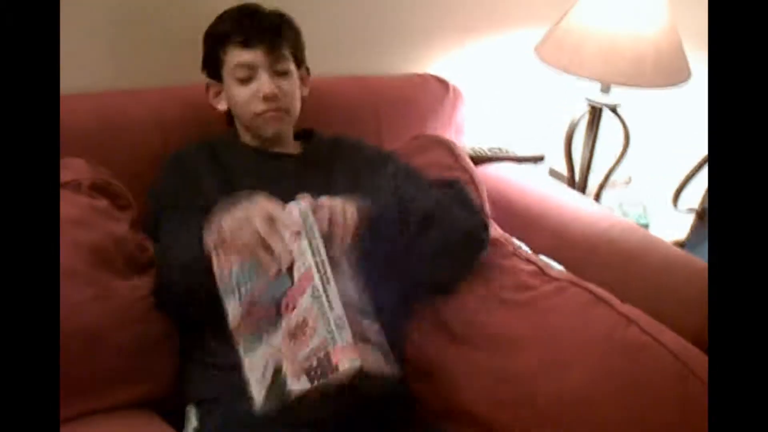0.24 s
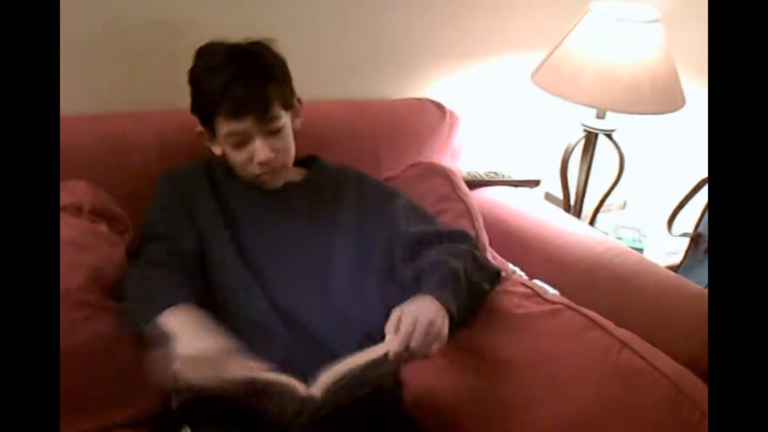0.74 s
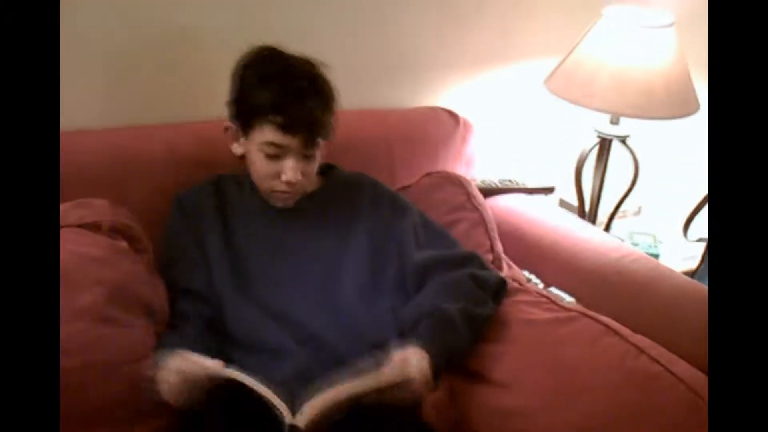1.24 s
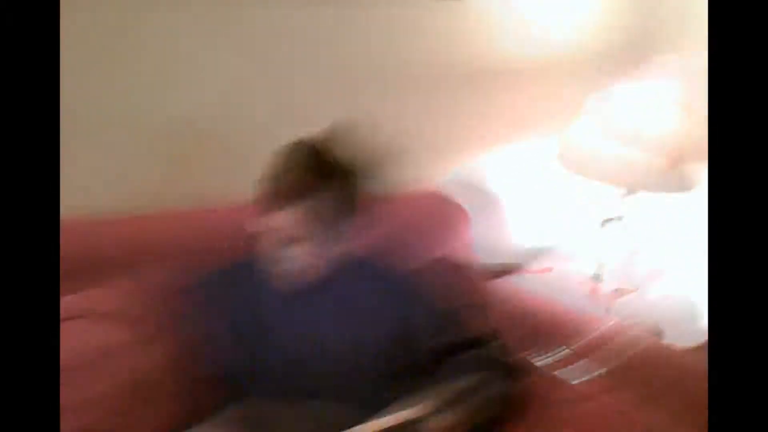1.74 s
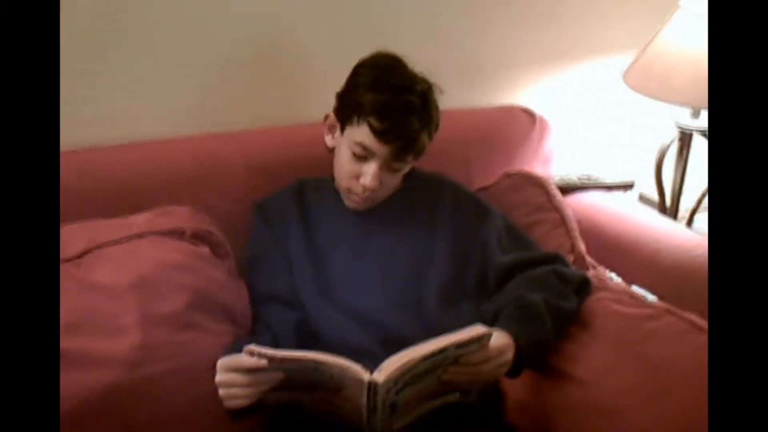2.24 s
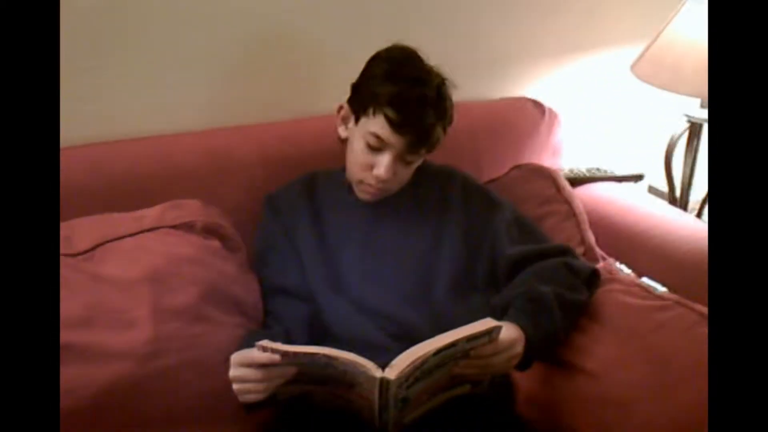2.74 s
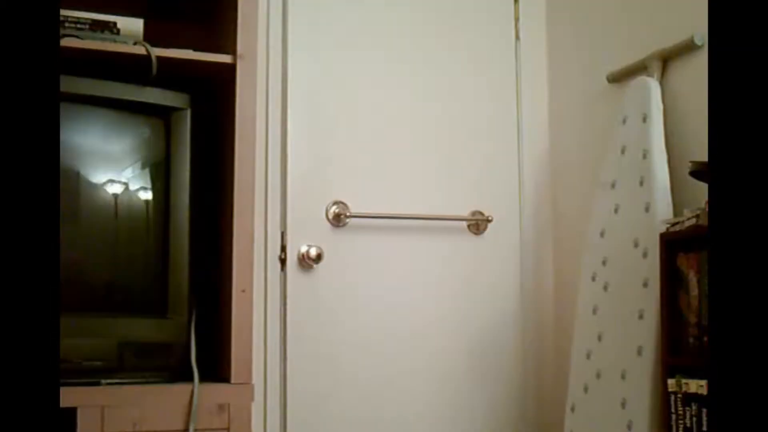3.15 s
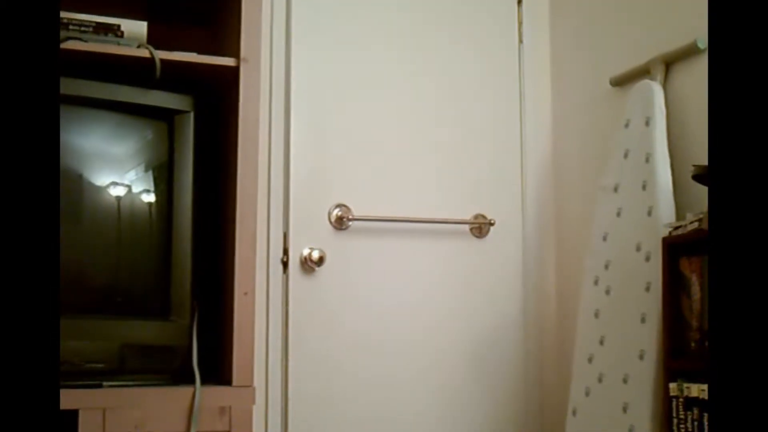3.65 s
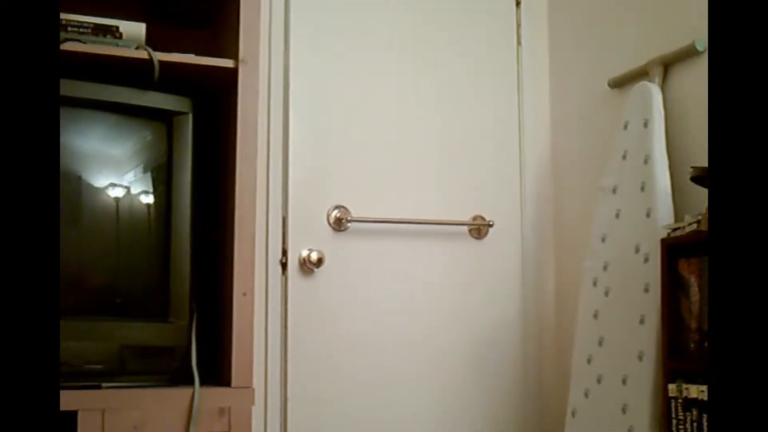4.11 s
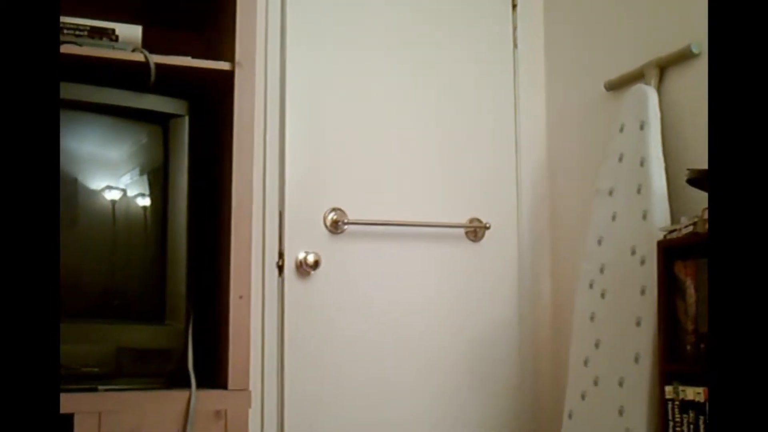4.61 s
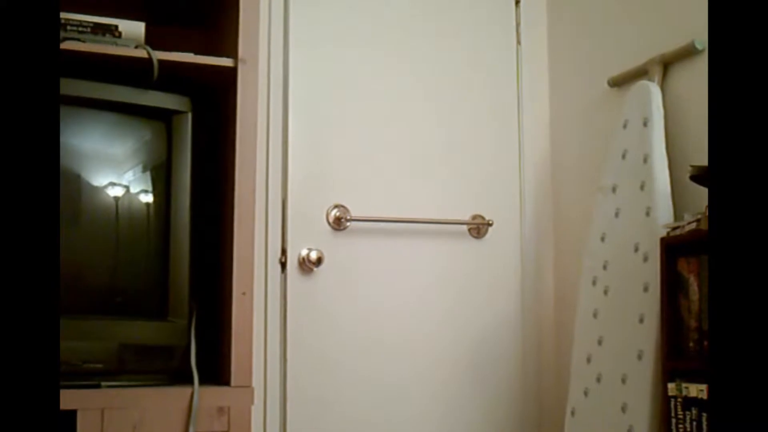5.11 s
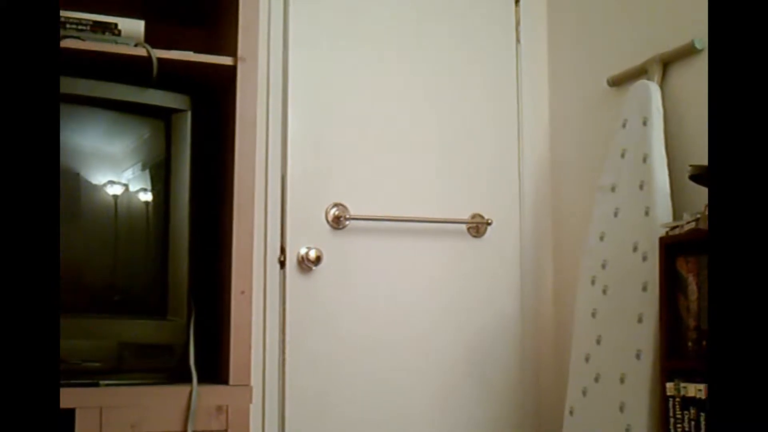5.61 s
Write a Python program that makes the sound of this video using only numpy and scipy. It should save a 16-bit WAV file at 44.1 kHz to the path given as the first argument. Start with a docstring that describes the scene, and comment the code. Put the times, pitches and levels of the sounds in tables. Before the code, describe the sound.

In a quiet room, paperback pages rustle softly, with light flaps and a few dry ticks from the spine. A dull pop and an instant of silence follow. Then someone knocks seven times on a closed wooden door, quickly and ever louder, the last rap making the latch chirp. Two pairs of heavy blows rattle the metal fittings and overload the dull-sounding microphone.

```python
"""Pages rustle softly as a boy on a sofa opens a paperback and settles it; the spine ticks. After a dull
pop and an instant of silence, someone knocks on a closed wooden door in a small room: seven growing raps,
two pairs of heavy blows. The paper sounds by sliding friction. Each impact excites the damped modes of
door and room. The last rap makes the latch chirp; it and the heavy blows rattle the metal fittings.
The heavy blows overload the microphone."""
import sys
import numpy as np
from scipy import signal
from scipy.fft import rfft, irfft, next_fast_len
from scipy.io import wavfile
from scipy.ndimage import uniform_filter1d, map_coordinates

SR = 44100
rng = np.random.default_rng(int(sys.argv[2]) if len(sys.argv) > 2 else 0)


def put_to_file(sound):
    """Save the sound as 16-bit audio at rate SR, in the file named by the first command-line argument."""
    columns = np.atleast_2d(sound).T  # one column per channel
    safe = np.clip(columns, -1, 1)
    whole_steps = np.round(safe * 32767)
    wavfile.write(sys.argv[1], SR, whole_steps.astype(np.int16))


N = 258867

# room tone and hiss: (frequency [Hz], relative level [dB])
AIR_SPECTRUM = [(12, -11.5), (20, -0.5), (120, -6), (146, -4.5), (319, -7.5), (369, -15.5), (449, -10.5),
                (521, -16), (618, -16), (770, -19.5), (829, -17.5), (1230, -21), (1570, -24.5),
                (4180, -29.5), (6990, -48.5), (9090, -72), (15400, -120)]
# broad sheets sliding: (frequency [Hz], relative level [dB])
SHEET_SPECTRUM = [(150, -8), (400, -2.5), (900, 0), (1400, 1), (2200, -12), (3200, -26), (5000, -41)]
# page edges sliding: (frequency [Hz], relative level [dB])
EDGE_SPECTRUM = [(1500, -24), (2800, -3.5), (4300, 6), (5400, -13.5), (7000, -15), (8000, -48)]
# page strokes: (start [s], rise [s], hold [s], release t60 [s], swish [dB], hiss re swish [dB])
PAGE_STROKES = [(.212, 0.013, 0.014, .35, -39.5, -8), (0.309, .08, 0.084, 0.53, -41.5, -11.5),
                (0.577, 0.062, .02, .35, -40.5, -13), (.917, .01, .06, .4, -44.5, -15),
                (1.024, 0.052, 0.055, 0.54, -40, -10.5), (1.322, 0.029, 0.07, .6, -39.5, -14),
                (1.638, 0.095, 0.052, 0.21, -40.5, -7.5)]
# the book shifting in the hands: (rise [s], hold [s], release t60 [s], swish [dB], hiss re swish [dB])
BOOK_SHIFT = (0.11, 1.74, 0.64, -48.5, -13)
# soft flaps and bumps: (time [s], level [dB], low edge [Hz], high edge [Hz], t60 [s])
BOOK_FLAPS = [(.455, -36, 89, 170, 0.2), (0.499, -20.5, 450, 1370, 0.067), (0.508, -21.5, 272, 1290, 0.28),
              (.592, -34, 280, 590, .2), (.712, -33, 231.5, 533, 0.2), (0.923, -38.5, 648, 1710, 0.12),
              (3.187, -42.5, 555.6, 1650, 0.2)]
# the book's dry ticks, plus a separate dull pop just before the brief silence:
# (time [s], level [dB], frequency [Hz], t60 [s], snap re ring [dB])
TICKS_AND_POP = [(.109, -39, 4000, .02, 0), (1.036, -29, 1200, .03, -14), (1.968, -34, 600, .025, -20),
                 (2.1297, -32, 1400, .012, 0), (2.1318, -24, 650, .025, -16), (2.172, -30, 600, .02, -17),
                 (2.1855, -22, 1300, .012, -4), (2.2335, -32, 1430, .018, -11),
                 (4.884, -32, 1500, .012, -4), (3.131, -19, 180, .02, -40)]
# the latch rubbing its plate: (time [s], level [dB], frequency [Hz])
LATCH_SLIPS = [(4.794, -17.5, 2470), (4.8046, -12, 2070), (4.813, -15.5, 1790)]
# loose fittings falling back: (time [s], level [dB], clashes [count])
FITTING_RATTLES = [(5.1515, -26.5, 1), (5.294, -32.5, 1), (5.591, -22.5, 3), (5.775, -27, 1)]
# resonances of the fittings: (frequency [Hz], bandwidth [Hz], relative level [dB])
METAL_MODES = [(3937, 250, 0.5), (5340, 930, -14), (7060, 92, -22)]
# metal striking metal: (frequency [Hz], relative level [dB])
CLASH_SPECTRUM = [(800, -13), (1300, 9.5), (2000, 1.5), (3000, -7.5), (4600, -4), (5600, -7.5), (6500, -16),
                  (7200, -23), (7900, -22.5)]
# the room's diffuse field: (frequency [Hz], relative level [dB])
REVERB_SPECTRUM = [(60, -23), (150, -11.5), (400, 5.5), (750, 0.5), (1300, -4), (2000, -14), (3000, -14),
                   (4500, -7.5), (7000, -19.5), (8000, -25.5)]
# the room's reverberation time: (frequency [Hz], t60 [s])
REVERB_TIMES = [(100, 0.54), (300, 0.33), (1000, 0.35), (5000, 0.28)]
# modes of the door and its room: (frequency [Hz], relative level [dB], t60 [s])
DOOR_MODES = [(46.87, -19.5, 0.94), (57.57, -15.5, 0.55), (83.2, -25, 0.4), (116.8, -21, 0.17),
              (132.5, -25, 0.31), (156.7, -22, 0.16), (213.7, -33, 0.18), (235.5, -21, 0.12),
              (265, -26, 0.2), (291.9, -31, .35), (347.5, -21, 0.22), (414, -24, 0.24), (462, -25, 0.32),
              (479.6, -25.5, 0.29), (510, -25.5, 0.3), (570.3, -22, 0.23), (643, -29, 0.19),
              (748, -19.5, 0.11), (808, -28.5, 0.29), (882, -27.5, 0.16), (930, -39.5, 0.4),
              (1015, -38.5, 0.36), (1055, -43, 0.3), (1124, -32, 0.23), (1148, -26.5, 0.15),
              (1261, -25, 0.089), (1316, -38.5, 0.28), (1376, -35, 0.27), (1472, -25.5, 0.08),
              (1595, -29.5, 0.092)]
# the whole leaf rocking in its frame: (frequency [Hz], relative level [dB], t60 [s])
LEAF_SWAY = (27, -20, 0.81)
# the struck panel's brief slap: (frequency [Hz], relative level [dB], time to peak [s])
PANEL_SLAP = [(67, -31.5, 0.0037), (318.4, -24.5, 0.013), (557, -15, 0.0057), (908, -22.5, 0.0036),
              (1134, -28.5, 0.0045), (1310, -34.5, 0.0059)]
# colour given by the hand's mass, at a weight of 1: (frequency [Hz], gain [dB])
HAND_COLOUR = [(25, 3), (55, 0.5), (125, 8.5), (250, 5), (360, -4.5), (550, -3.5), (850, 0.5), (1200, 3.5),
               (1700, 2.5), (2500, -0.5)]
# blows on the door: (time [s], force level [dB])
BLOWS = [(3.81, -0.3), (3.9653, 0), (4.122, -0.4), (4.2907, 1.34), (4.4574, 1.5), (4.6235, 3),
         (4.7845, 5.5), (5.103, 8.5), (5.2541, 10.5), (5.5704, 12), (5.758, 7)]


def amp(db):
    """Decibels to amplitude ratio."""
    return 10 ** (np.asarray(db) / 20)


def unit(x):
    """Normalisation to rms 1."""
    return x / np.sqrt(np.mean(x ** 2) + 1e-20)


def along(points, hz):
    """Interpolation of (frequency, value) points on a log frequency axis."""
    f, v = np.transpose(points)
    return np.interp(np.log(hz + 1), np.log(f + 1), v)


def add(track, s, sound):
    """Superposition: the sound joins the track from s seconds on."""
    part = track[round(s * SR):][:len(sound)]
    part += sound[:len(part)]


def filtered(x, gain):
    """Zero-phase filtering by a gain that depends on frequency."""
    m = next_fast_len(len(x) + 8192)
    return irfft(rfft(x, m) * gain(np.fft.rfftfreq(m, 1 / SR)), m)[:len(x)]


def causal(x, gain, size=4096):
    """Minimum-phase filtering: nothing sounds before the blow."""
    cepstrum = irfft(np.log(np.maximum(gain(np.fft.rfftfreq(size, 1 / SR)), 1e-6)))
    cepstrum[1:size // 2] *= 2
    cepstrum[size // 2 + 1:] = 0
    impulse_response = irfft(np.exp(rfft(cepstrum)))
    return signal.fftconvolve(x, impulse_response)[:len(x)]


def shaped_noise(gain, size=SR):
    """Spectral shaping: white noise through a gain curve, at rms 1."""
    return unit(filtered(rng.standard_normal(size), gain))


def noise(spectrum, size=SR):
    """Coloured noise of rms 1 with a tabulated spectrum."""
    return shaped_noise(lambda hz: amp(along(spectrum, hz)), size)


def second():
    """A time axis of one second."""
    return np.arange(SR) / SR


def fade(t60, rise=1e-5):
    """Exponential damping: an envelope that builds up, then loses 60 dB in t60 seconds."""
    return np.exp(-np.log(1000) * second() / t60) * (1 - np.exp(-second() / rise))


def room_tone():
    """Stationary noise: the quiet of the house."""
    return amp(-44) * noise(AIR_SPECTRUM, N)


def slide_speed(start, rise, hold, t60):
    """Damped motion: a sliding page picks up speed, holds it, then slows exponentially."""
    t = np.arange(N) / SR - start
    return np.clip(t / rise, 0, 1) * np.exp(-np.log(1000) * np.maximum(t - rise - hold, 0) / t60)


def pages(catch_rate_hz=90, catch_depth_db=1.5):
    """Sliding friction: paper catches and lets go, its noise grows with speed, strokes add in power."""
    strokes = [*PAGE_STROKES, (0, *BOOK_SHIFT)]
    moves = [(slide_speed(*timing), db, edge_db) for *timing, db, edge_db in strokes]
    swish = np.sqrt(sum((speed * amp(db)) ** 2 for speed, db, _ in moves))
    hiss = np.sqrt(sum((speed * amp(db + edge_db)) ** 2 for speed, db, edge_db in moves))
    catch_index = np.arange(N) * catch_rate_hz / SR
    catches = map_coordinates(rng.standard_normal(N // 100), [catch_index], mode="mirror")
    grip = unit(amp(catch_depth_db * catches))
    return grip * (swish * noise(SHEET_SPECTRUM, N) + hiss * noise(EDGE_SPECTRUM, N))


def flaps():
    """Soft impacts give dull, band-limited puffs of noise, as when the book falls open on a lap."""
    out = np.zeros(N)
    for s, db, low_hz, high_hz, t60 in BOOK_FLAPS:
        band = lambda hz: hz ** 2 / np.hypot(hz ** 2, low_hz ** 2) / np.sqrt(1 + (hz / high_hz) ** 13)
        add(out, s, amp(db) * shaped_noise(band) * fade(t60, rise=0.0013))
    return out


def ticks_and_pop():
    """Impulse excitation: each is a few cycles of damped ring under a tiny snap."""
    out = np.zeros(N)
    snap_spectrum = [(500, 29.5), (4500, 23.0), (7000, -12.0), (8500, -46.0)]
    for s, db, hz, t60, snap_db in TICKS_AND_POP:
        snap = amp(snap_db) * noise(snap_spectrum) * fade(0.011)
        ring = np.sin(2 * np.pi * hz * second()) * fade(t60)
        add(out, s, amp(db) * (ring + snap))
    return out


def latch():
    """Stick-slip friction: each slip is a brief chirp with a faint echo around its pitch."""
    out = np.zeros(N)
    for s, db, hz in LATCH_SLIPS:
        chirp = np.sin(2 * np.pi * hz * second()) * fade(0.015, rise=0.00067)
        echo = shaped_noise(lambda f: 1 / (1 + ((f - hz) / 220) ** 2)) * fade(0.31, rise=0.0057)
        add(out, s, amp(db) * (chirp + amp(-24) * echo))
    return out


def fittings(jolt_above_db=4.2, jolt_lag_s=0.011, jolt_gain_db=-45, chatter_gap_s=0.0138):
    """Contact rattle: loose metal resonates when jolted, and chatters as the door springs back."""
    out = np.zeros(N)
    resonances = lambda f: sum(amp(db) / (1 + (2 * (f - hz) / width) ** 2)
                               for hz, width, db in METAL_MODES)
    jolts = [(s + jolt_lag_s, db + jolt_gain_db) for s, db in BLOWS if db > jolt_above_db]
    chatter = [(s + k * chatter_gap_s, db)
               for s, db, count in FITTING_RATTLES for k in range(round(count))]
    for s, db in jolts + chatter:
        ring = amp(-3.5) * shaped_noise(resonances)
        clash = amp(-6.5) * noise(CLASH_SPECTRUM)
        add(out, s, amp(db) * (ring + clash) * fade(0.24, rise=0.00063))  # smeared by the room
    return out


def reverberation():
    """Diffuse field: the room's reflections merge into decaying noise, and the treble dies first."""
    hz, t, spectra = signal.stft(noise(REVERB_SPECTRUM), SR, nperseg=256)
    decay = np.exp(-np.log(1000) * t / along(REVERB_TIMES, hz)[:, None])
    tail = signal.istft(spectra * decay, SR, nperseg=256)[1][:SR]
    return tail * (1 - np.exp(-second() / 0.0014))


def door_mode(hz, t60):
    """Damped oscillation: low modes follow the push quickly, higher ones build up between the walls."""
    phase = 2 * np.pi * hz * second()
    if hz < 100:
        return np.sin(phase) * fade(t60, rise=0.0047)
    return np.cos(phase) * fade(t60, rise=0.0084)


def hand_contact(response, force_db, weight, soft_hz=830, hard_hz=1650, stiffen_db=3):
    """Contact stiffness: a low-pass whose cut-off rises with force; the hand's weight adds boom."""
    cutoff_hz = hard_hz - (hard_hz - soft_hz) * np.exp(-force_db / stiffen_db)
    gain = lambda hz: amp(weight * along(HAND_COLOUR, hz)) / np.sqrt(1 + (hz / cutoff_hz) ** 4)
    return causal(response, gain)


def knocks(fist_above_db=6.4, knuckle_weight=0.44, fist_weight=1.246, mode_spread_db=2.03):
    """Modal superposition: blows on nearly the same spot excite the same modes in slightly varied mix."""
    t, out = second(), np.zeros(N)
    modes = np.array([amp(db) * door_mode(hz, t60) for hz, db, t60 in DOOR_MODES])
    slap = sum(amp(db) * np.sin(2 * np.pi * hz * t) * (t / peak * np.exp(1 - t / peak)) ** 2
               for hz, db, peak in PANEL_SLAP)
    sway_hz, sway_db, sway_t60 = LEAF_SWAY
    sway = amp(sway_db) * np.cos(2 * np.pi * sway_hz * t) * fade(sway_t60, rise=0.014)
    walls = amp(-23.5) * reverberation()
    for s, force_db in BLOWS:
        weight = fist_weight if force_db > fist_above_db else knuckle_weight
        ring = amp(rng.normal(0, mode_spread_db, len(DOOR_MODES))) @ modes
        # a fist covers more of the panel and stirs new modes with each blow
        stirred = amp(-27.5 + 5.77 * weight) * reverberation()
        response = sway + ring + slap + walls + stirred
        add(out, s, amp(force_db) * hand_contact(response, force_db, weight))
    return out


def scene():
    """Linear superposition of all sources in one channel."""
    door = knocks() + fittings() + latch()
    paper = pages() + flaps()
    return (door + paper + ticks_and_pop() + room_tone())[None]


def record(dry):
    """Band limiting and saturation in a dull microphone; the sound also cuts out for an instant."""
    rolloff_hz, treble_leak_db, band_limit_hz = 7400, -43.5, 16000
    silence_from_s, silence_to_s = 3.143, 3.162
    lowpass = signal.cheby1(6, 0.5, rolloff_hz, fs=SR, output="sos")
    dull = signal.sosfilt(lowpass, dry[0]) + amp(treble_leak_db) * dry[0]
    t = np.arange(N) / SR
    silent = (t > silence_from_s) & (t < silence_to_s)
    gate = uniform_filter1d(np.where(silent, amp(-45), 1), size=128)
    clipped = np.clip(dull * gate, -1, 1)
    return filtered(clipped, lambda hz: 1 / (1 + (hz / band_limit_hz) ** 60))[None]


dry = scene()
out = record(dry)
put_to_file(out)
```